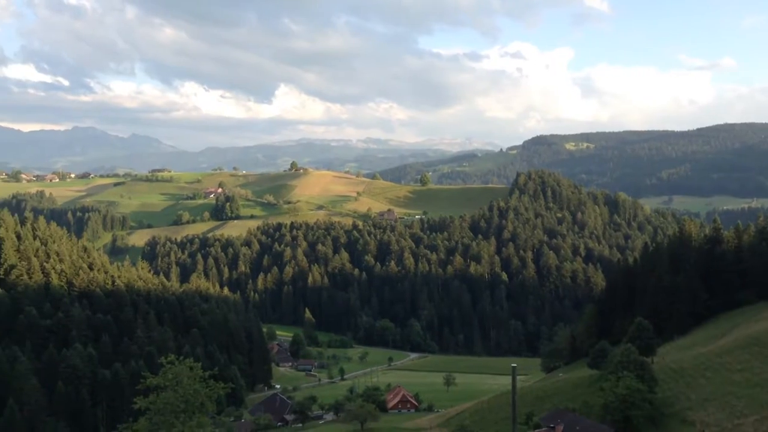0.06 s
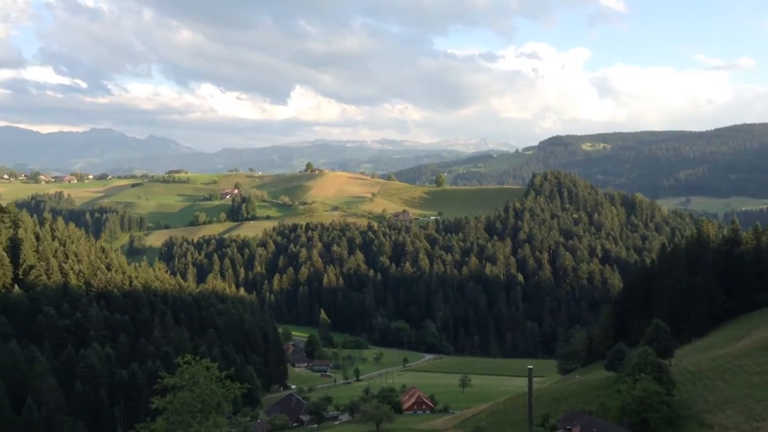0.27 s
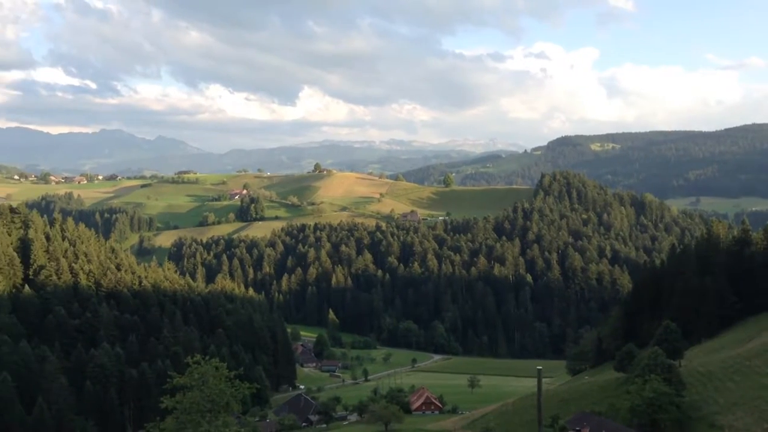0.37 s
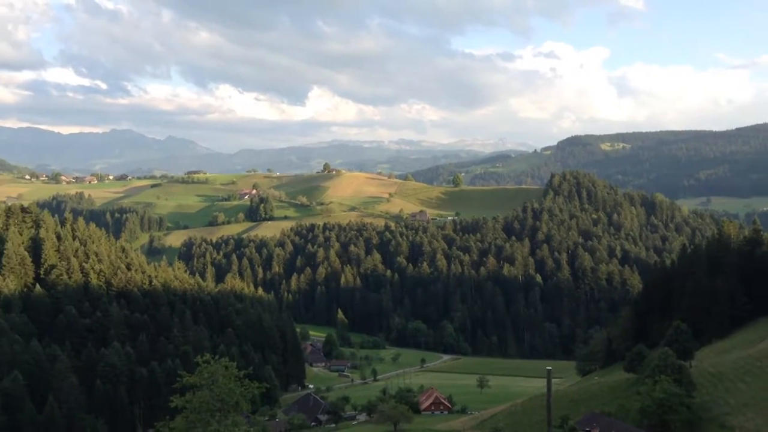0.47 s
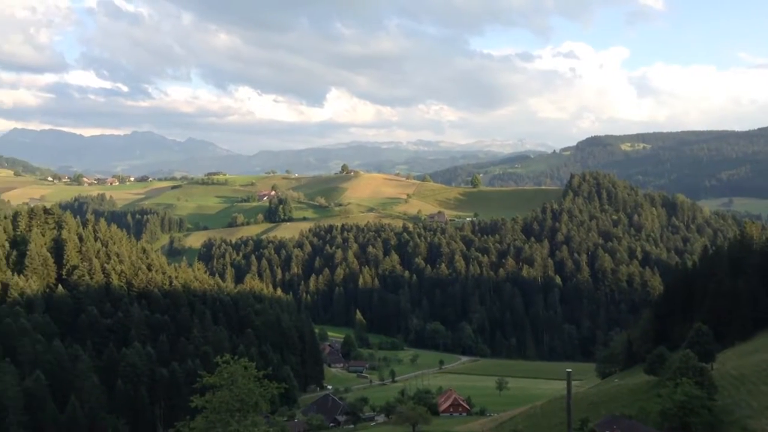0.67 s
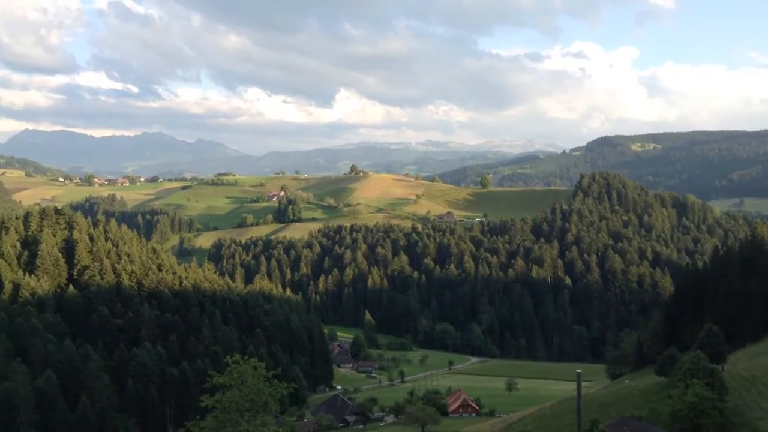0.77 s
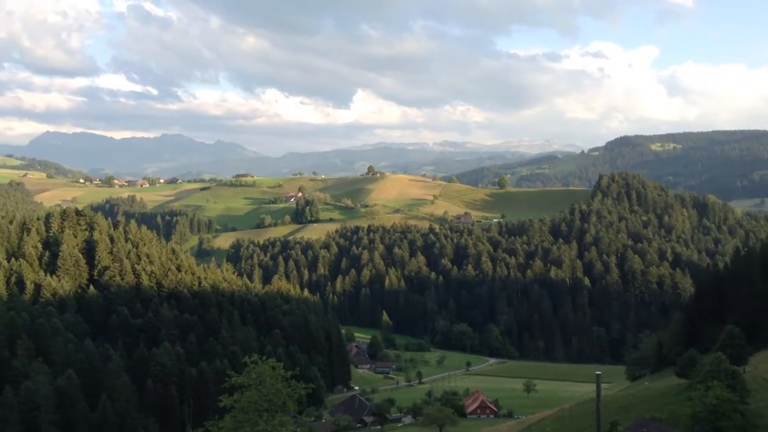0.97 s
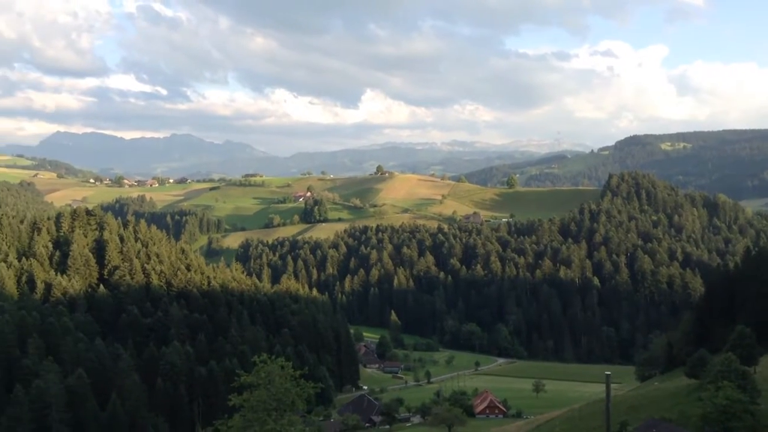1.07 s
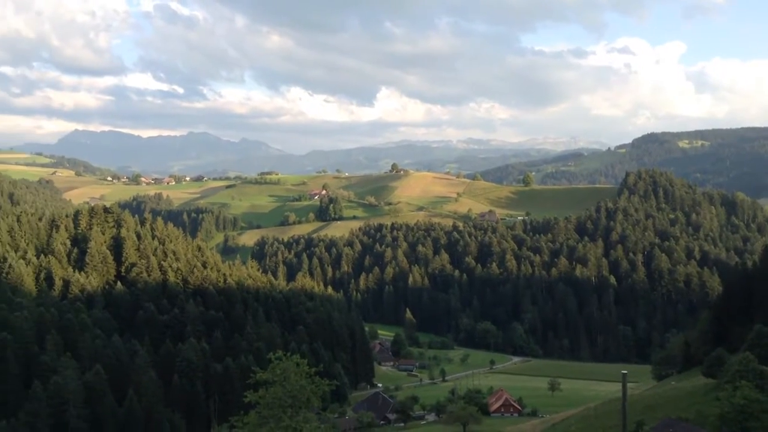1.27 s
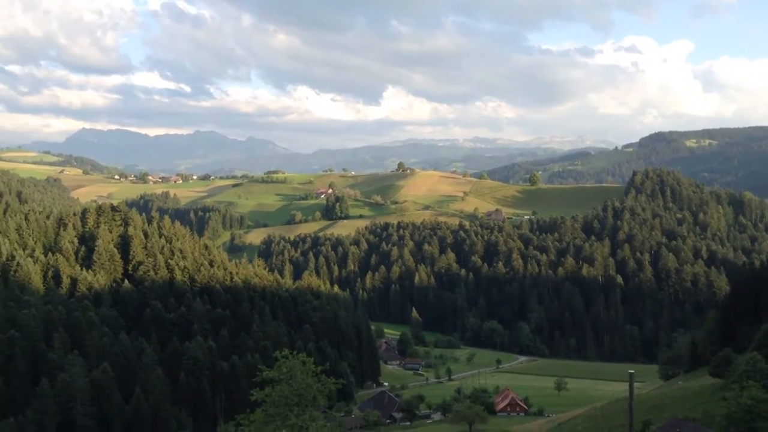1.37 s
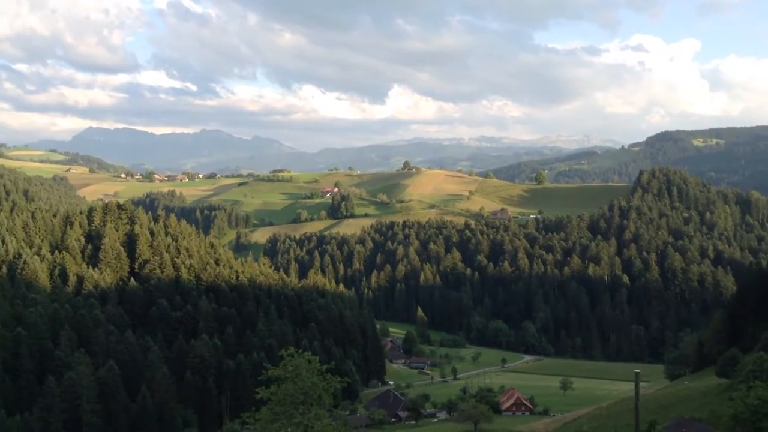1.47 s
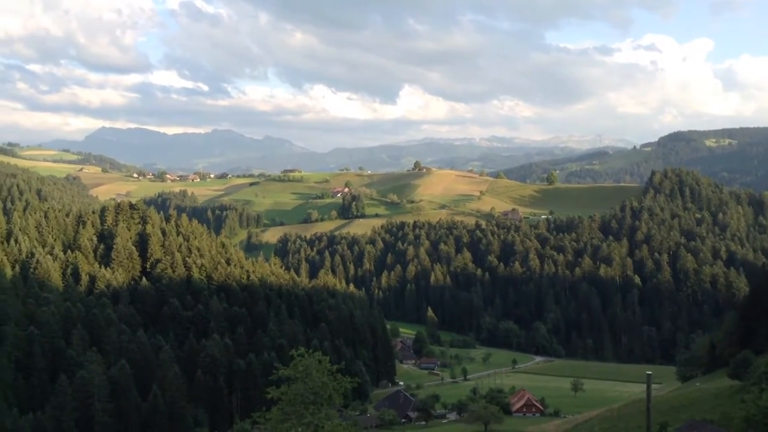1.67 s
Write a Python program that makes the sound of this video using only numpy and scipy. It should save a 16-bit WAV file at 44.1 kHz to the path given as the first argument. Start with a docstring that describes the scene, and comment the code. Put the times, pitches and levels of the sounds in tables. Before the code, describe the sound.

A sheep close to the microphone gives one long, low bleat while a small bell clinks four times. As the bleat ends, a second bell rings farther off. Faint crickets chirp in the open mountain pasture.

```python
"""An open mountain pasture on one microphone, in faint valley air with crickets chirping in the grass.
First comes a thin falling whistle, probably a bird. Almost at once a sheep gives one long, low bleat,
its vocal folds ringing throat and nose, while a clapper strikes a small bell nearby four times.
As the bleat dies a second bell answers from farther off; last, a distant animal starts to call."""
import sys
import numpy as np
from scipy import signal
from scipy.fft import rfft, irfft
from scipy.io import wavfile
from scipy.ndimage import uniform_filter1d

SR = 44100
rng = np.random.default_rng(int(sys.argv[2]) if len(sys.argv) > 2 else 0)


def store_wav(level_fs):
    """Save 16-bit WAV to argv[1]."""
    pcm = np.round(np.clip(np.atleast_2d(level_fs), -1, 1) * 32767)
    wavfile.write(sys.argv[1], SR, pcm.T.astype(np.int16))


N = 74970
T = np.arange(N) / SR
BLEAT_START_S, BLEAT_END_S = .13, 1.25

# pitch of the bleat: t/s, f/Hz
PITCH = [(.14, 118.1), (.24, 119.9), (.285, 118.4), (.305, 106), (.335, 127.7), (.39, 127.8), (.42, 137.4),
         (.5, 141.1), (.55, 147), (.63, 155.9), (.78, 155.5), (.838, 148.8), (.865, 154.1), (.95, 152.7),
         (1.0, 149.2), (1.06, 148.7), (1.115, 152.6), (1.135, 145.1), (1.155, 122.2), (1.19, 139.8)]
# effort of the bleat: t/s, level/dB
EFFORT = [(.15, -49), (.18, -31), (.234, -19), (.25, -3), (.29, 0), (.312, -4.5), (.335, 0.5), (.41, 0),
          (.5, -.5), (.575, 0.5), (.62, 1.5), (.72, 0), (.825, 0), (.855, -6), (.875, -0.5), (.922, -2),
          (.985, -1), (1.02, -4), (1.063, -1), (1.08, -6), (1.11, -3.5), (1.142, -4.5), (1.16, -13.5),
          (1.176, -11.5), (1.2, -28)]
# hoarseness: t/s, amount/0-1
HOARSE = [(.2, 0.65), (.3, 1), (.42, 0.64), (.51, 0.6), (.56, 0.28), (.8, 0.11), (.83, 0.58), (.865, 0.35),
          (1.1, 0.45), (1.16, 0.7)]
# mouth: t/s, opening/0-1
MOUTH = [(.22, 0), (.28, 0.34), (.39, 0.99), (.52, 1), (.62, 1), (.8, 1), (.95, 0.74), (1.14, 0.1)]


def amp(db):
    """Decibels to gain."""
    return 10 ** (np.asarray(db) / 20)


def evened(x):
    """Scales to rms 1."""
    return x / np.sqrt(np.mean(x ** 2) + 1e-20)


def curve(rows, column=1):
    """One column of a table, joined by straight lines in time."""
    rows = np.array(rows)
    return np.interp(T, rows[:, 0], rows[:, column])


def spectrum_db(points, hz):
    """A spectrum's level at hz, interpolated over log frequency."""
    f, db = np.transpose(points)
    return np.interp(np.log(hz + 1), np.log(f + 1), db)


def drift(rate_hz):
    """Random wander below rate_hz, rms 1."""
    slow = np.fft.rfftfreq(N, 1 / SR) < rate_hz
    return evened(irfft(rfft(rng.standard_normal(N)) * slow, N))


def colour(x, points, size=4096):
    """Causal filter with the given spectrum."""
    log_gain = np.log(amp(spectrum_db(points, abs(np.fft.fftfreq(size, 1 / SR)))))
    taps = np.fft.ifft(np.exp(np.conj(signal.hilbert(log_gain)))).real
    return signal.fftconvolve(x, taps[:size // 2])[:N]


def resonate(x, hz, width_hz):
    """A resonance of gain 1 that follows the curve hz."""
    turn = np.exp(2j * np.pi * np.cumsum(hz) / SR)
    pole = np.exp(-np.pi * width_hz / SR)
    return 2 * (turn * signal.lfilter([1 - pole], [1, -pole], x / turn + 1e-18)).real


def hillside(x, t60_s=.26, rise_s=.026):
    """Diffuse scatter reaching the microphone from the slope and the trees."""
    tail = rng.standard_normal(N) * amp(-60 * T / t60_s) * np.minimum(T / rise_s, 1)
    return signal.fftconvolve(x, tail / np.linalg.norm(tail))[:N]


def valley_air(level_db=-66.5, patch_db=.9):
    """The soft, slightly patchy noise of the valley, behind everything."""
    # colour of the air: f/Hz, relative level/dB
    air_colour = [(25, -40), (60, -26), (95, -44), (140, 0), (220, -1), (400, -4), (900, -1.5), (1600, -1),
                  (2400, -5.5), (3300, -9), (4500, -6), (5600, -18.5), (8000, -19), (15000, -22)]
    hz = np.fft.rfftfreq(1024, 1 / SR)
    real, imag, patches = rng.standard_normal((N // 256 + 5, len(hz), 3)).T
    patches = uniform_filter1d(patches, size=16, axis=0)  # across frequency
    patches = evened(uniform_filter1d(patches, size=18, axis=1))  # across time
    frames = (real + 1j * imag) * amp(spectrum_db(air_colour, hz)[:, None] + patch_db * patches)
    return amp(level_db) * evened(signal.istft(frames, nperseg=1024, noverlap=768)[1][:N])


def glide(rows, echo_db):
    """A gliding pure tone with its scatter off the hillside."""
    sounding = (T > rows[0][0]) & (T < rows[-1][0])
    tone = amp(curve(rows, 2)) * np.sin(2 * np.pi * np.cumsum(curve(rows)) / SR) * sounding
    return tone + amp(echo_db) * hillside(tone)


def distant_calls():
    """Far from the microphone: a falling whistle, later the rising start of an animal's call."""
    # thin whistle: t/s, f/Hz, level/dB
    whistle = [(.03, 8300, -98), (.08, 8130, -83), (.2, 7850, -80), (.38, 7660, -78), (.46, 7610, -84),
               (.52, 7590, -103)]
    # animal call: t/s, f/Hz, level/dB
    far_call = [(1.62, 475, -84), (1.66, 505, -74), (1.685, 560, -57), (1.71, 576, -52)]
    return glide(whistle, echo_db=-17) + glide(far_call, echo_db=-3)


def chirp(start, hz, strokes=4, stroke_s=.02, period_s=.0365, fall=.11):
    """A few wing strokes, each a short tone that falls in pitch."""
    t = T - start
    progress = np.clip(t % period_s / stroke_s, 0, 1)
    tone = np.sin(2 * np.pi * np.cumsum(hz * (1 + fall * (.5 - progress))) / SR)
    return tone * np.sin(np.pi * progress) ** 2 * (t > 0) * (t < strokes * period_s)


def crickets(hz=4653, count=44, chorus_db=-62, uneven_db=2.5, scatter_s=.025, spread=.03):
    """Chirps in the grass near the microphone, over a chorus spread across the meadow."""
    # nearest chirps: t/s, level/dB
    chirps = [(.003, -53), (.146, -55), (0.184, -57), (1.19, -53), (1.52, -51.5)]
    near = sum(amp(db) * chirp(start, hz) for start, db in chirps)
    starts = np.linspace(-.146, T[-1], count)
    chances = np.sqrt(3) * rng.uniform(-1, 1, (count, 3))
    chorus = sum(amp(uneven_db * loud) * chirp(start + scatter_s * late, hz * (.985 + spread * sharp))
                 for start, (late, sharp, loud) in zip(starts, chances))
    direct = near + amp(chorus_db) * evened(chorus)
    return direct + amp(-4.5) * hillside(direct)


def ring(start, db, t60, attack_s=.003):
    """Envelope of one struck mode."""
    t = np.maximum(T - start, 0)
    return np.minimum(t / attack_s, 1) * amp(db - 60 * t / t60)


def far_bell(blow_s=1.214):
    """A bell farther off, struck once and left to ring."""
    # modes: f/Hz, level/dB, t60/s
    modes = [(2316, -69.5, 3.1), (5435, -63, 2.1), (5414, -79, 1.9), (9320, -75.5, 0.74),
             (14100, -79, 0.28)]
    return sum(ring(blow_s, db, t60) * np.sin(2 * np.pi * hz * T) for hz, db, t60 in modes)


def near_bell():
    """Each blow adds energy to the modes; where the clapper lands decides how much. Close pairs beat."""
    # modes: f/Hz, level/dB struck on the face, on the side, on the lip, t60/s, lobe/factor on the turn
    modes = [(3826.5, -70, -56.5, -55, 2.42, 0.94), (3866, -56, -56.5, -54, 4.34, -1.7),
             (6560, -77, -56, -55, 1.03, 0.42), (6584, -58.5, -74, -68, 1.07, -0.2),
             (7294, -79, -81, -58, 0.87, 0.36), (7312, -59.5, -73, -54, 0.64, 0.58),
             (8340, -88, -89, -54, 0.28, 0.39), (9806, -80, -86, -63.5, 0.79, 0.75),
             (9880, -75, -71.5, -97, 0.52, 0), (10080, -65, -97, -86, 0.28, 0),
             (10090, -75, -78, -65, 0.38, 0), (13768, -67, -81, -68, 0.3, 0)]
    # clapper blows: t/s, level/dB, place (0 face, 1 side, 2 lip), brightness/dB per octave
    blows = [(.186, 0.5, 0.26, -0.5), (0.549, -3, 0.9, 3.5), (0.753, -3.5, 1.42, 6.5),
             (0.919, -2.5, 2, -0.5)]
    # the swing turns one of the two lowest modes toward the microphone: t/s, level/dB
    turn = [(.2, 1), (.9, 1), (1.03, 8), (1.2, 3), (1.4, -0.5), (1.5, 0.5), (1.6, 12.5), (1.7, 12)]
    bell = 0
    for hz, *place_db, t60, lobe in modes:
        octaves = np.log2(hz / modes[0][0])
        energy = 0
        for start, db, place, bright_db in blows:
            struck_db = db + np.interp(place, [0, 1, 2], place_db) + bright_db * octaves
            energy += ring(start, struck_db, t60) ** 2
        bell += np.sqrt(energy) * amp(lobe * curve(turn)) * np.sin(2 * np.pi * hz * T)
    return bell


def snort(peak_s=.189, swell_s=.031, gain_db=-46.5):
    """A short snort just before the sheep's mouth opens."""
    # colour of the snort: f/Hz, gain/dB
    snort_colour = [(100, -24), (600, -14), (950, -7), (1400, 0), (1750, -9), (2200, -0.5), (2600, -19),
                    (3200, -40), (15000, -59)]
    swell = np.exp(-((T - peak_s) / swell_s) ** 2)
    return colour(amp(gain_db) * swell * rng.standard_normal(N), snort_colour)


def breath_puffs(cycles, decay_cycles=.84):
    """A puff of noise on each cycle of the vocal folds, stronger when the voice is hoarse."""
    return curve(HOARSE) * np.exp(-(cycles % 1) / decay_cycles) * rng.standard_normal(N)


def throat_hiss(gain_db=-39.5):
    """Hiss pulsing at the pitch of the bleat while the open throat is hoarse."""
    # colour of the hiss: f/Hz, gain/dB
    hiss_colour = [(100, -39), (2000, -30), (3100, 7), (4000, -7), (4700, 3), (5300, -12.5), (5900, -16),
                   (8000, -38), (15000, -52)]
    puffs = breath_puffs(np.cumsum(curve(PITCH)) / SR)
    return colour(puffs * curve(MOUTH) * amp(gain_db + curve(EFFORT)) * (T < BLEAT_END_S), hiss_colour)


def vocal_folds(cycles):
    """One sharp pulse per cycle, placed between samples by a windowed sinc."""
    pulses, offsets = np.zeros(N + 32), np.arange(-8, 9)
    for place in np.interp(np.arange(1, int(cycles[-1])), cycles, np.arange(N)):
        at = int(place) + offsets
        pulses[at] += np.sinc(at - place) * np.hanning(len(offsets))
    return pulses[:N]


def throat(source):
    """The throat colours the voice; its resonances shift and strengthen as the mouth opens."""
    # colour of the throat: f/Hz, gain/dB
    throat_colour = [(60, -36.5), (200, -21), (310, -23.5), (450, -22), (600, -9), (750, -5), (950, -5),
                     (1500, -2), (2200, -1), (3000, -3), (3600, -11), (4700, -22.5), (5400, -33),
                     (8000, -44.5), (15000, -54)]
    # resonances: f/Hz nearly shut, f/Hz open, width/Hz, lift/dB nearly shut, lift/dB open
    formants = [(772, 805, 45.8, 18, 21), (1945, 1926, 166, 3, 10), (2673, 2580, 187, 8.5, 9.5)]
    opening = curve(MOUTH)
    voice = -colour(source, throat_colour)
    for shut_hz, open_hz, width_hz, shut_db, open_db in formants:
        hz = shut_hz + opening * (open_hz - shut_hz)
        lift = amp(shut_db + opening * (open_db - shut_db))
        voice = voice + lift * resonate(voice, hz, width_hz)
    return voice


def nose(buzz, sounding, width_hz=41, gain_db=-45):
    """The buzz of the folds hums through two narrow nasal resonances."""
    # strength of the hum: t/s, lower level/dB, upper level/dB
    nose_db = [(.13, -3, -34), (.165, 9.5, -8), (.2, 0, 9.5), (.3, -9, 4.5), (.4, -9, -4), (.5, 4.5, -1),
               (.8, -2, -12), (.87, 4.5, -13.5), (.95, 0, -6.5), (1.12, 8.5, -1), (1.16, -22, -1),
               (1.21, -1, 5), (1.25, -20, -32)]
    # nasal resonances: t/s, lower f/Hz, upper f/Hz
    nose_hz = [(.15, 187, 267), (.22, 146, 219), (.3, 135, 230), (.4, 140, 257), (.6, 157, 308.5),
               (1.13, 164, 287), (1.22, 160, 242)]
    hum = 0
    for column in (1, 2):
        hz = curve(nose_hz, column)
        band = resonate(resonate(buzz, hz, width_hz), hz, width_hz)
        hum += band * amp(gain_db + curve(nose_db, column)) * sounding
    return signal.sosfilt(signal.butter(4, 110, "high", fs=SR, output="sos"), hum)


def bleat(gain_db=-14.5, jitter_cycles=.014, shimmer_db=-.8, throat_rasp=.029, nose_rasp=2.1):
    """The sheep in the foreground: fold pulses and puffs of breath drive throat and nose."""
    hoarse = curve(HOARSE)
    cycles = np.cumsum(curve(PITCH)) / SR + jitter_cycles * hoarse * drift(rate_hz=70)
    folds = vocal_folds(cycles) * amp(shimmer_db * hoarse * drift(rate_hz=70))
    puffs = breath_puffs(cycles)
    sounding = (T > BLEAT_START_S) & (T < BLEAT_END_S)
    voice = throat((folds + throat_rasp * puffs) * amp(gain_db + curve(EFFORT)) * sounding)
    voice += nose(evened(folds) + nose_rasp * puffs, sounding)
    return voice + amp(-12) * hillside(voice)


def scene():
    """The pasture from one spot, in mono."""
    sheep = bleat() + throat_hiss() + snort()
    return (sheep + near_bell() + far_bell() + crickets() + distant_calls() + valley_air())[None]


def record(dry, edge_hz=15330):
    """The band limit of the recorder."""
    lowpass = signal.firwin(511, edge_hz, window=("kaiser", 9), fs=SR)
    return signal.oaconvolve(dry, lowpass[None], "same")


dry = scene()
out = record(dry)
store_wav(out)
```